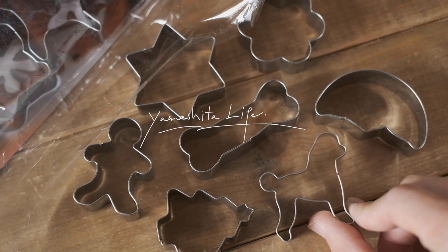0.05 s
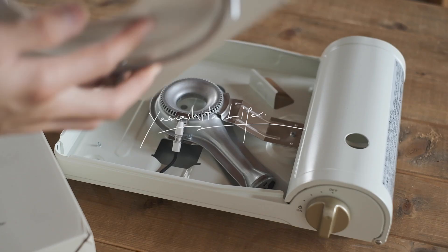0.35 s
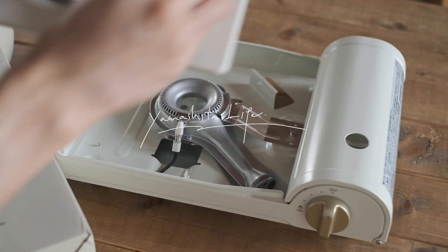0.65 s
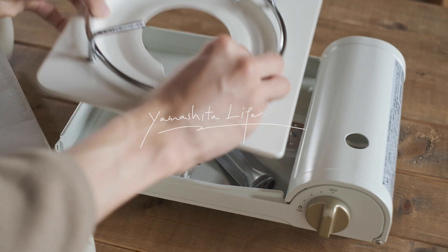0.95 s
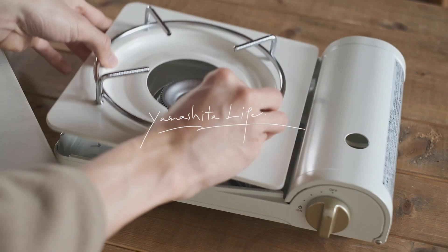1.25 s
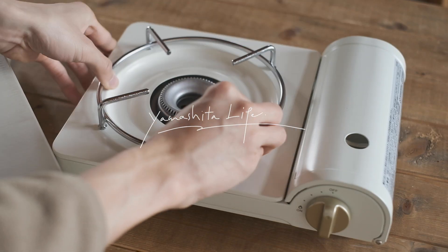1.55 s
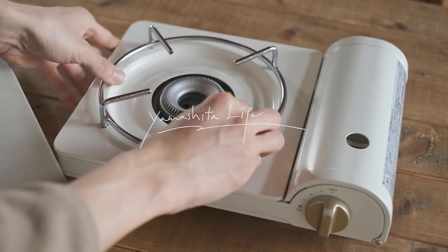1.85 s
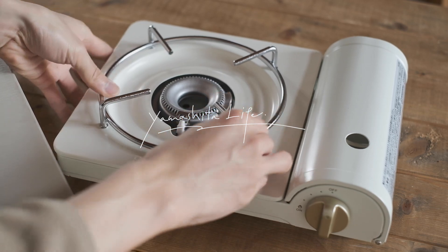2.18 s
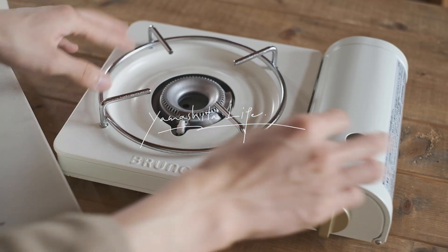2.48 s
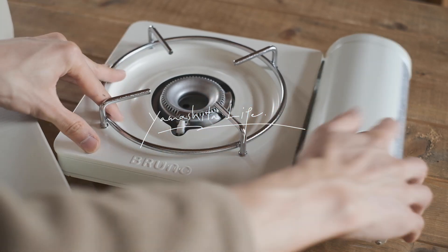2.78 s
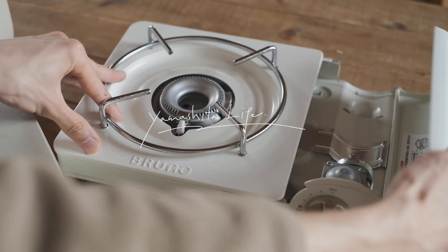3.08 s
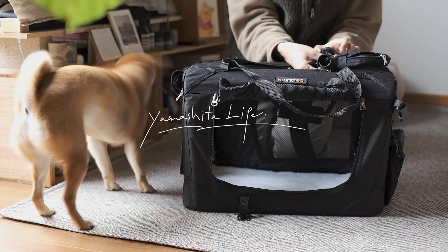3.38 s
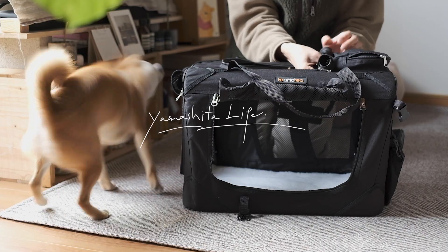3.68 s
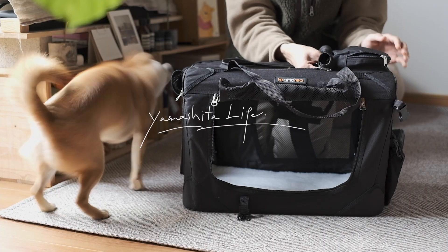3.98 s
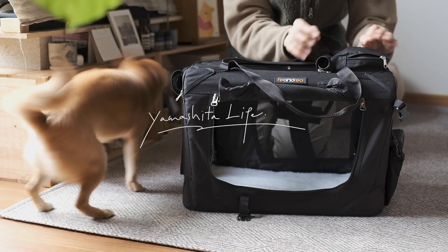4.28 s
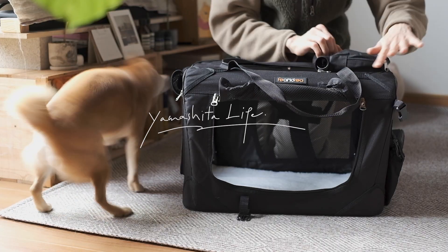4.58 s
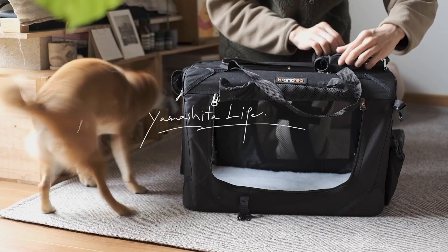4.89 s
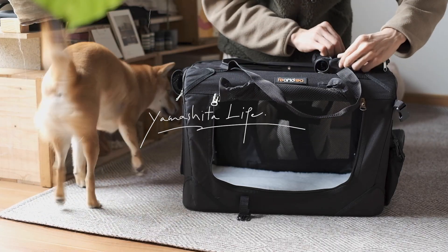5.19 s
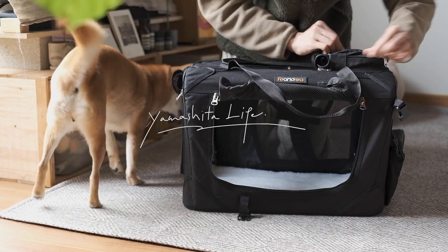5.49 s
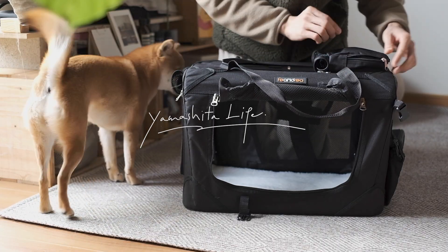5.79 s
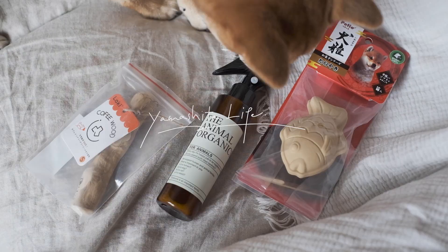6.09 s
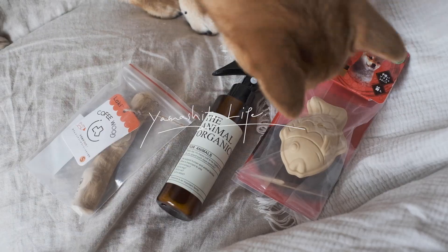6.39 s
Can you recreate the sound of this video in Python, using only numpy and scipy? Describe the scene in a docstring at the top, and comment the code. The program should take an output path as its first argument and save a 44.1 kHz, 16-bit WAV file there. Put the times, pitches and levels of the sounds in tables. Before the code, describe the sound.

In a quiet room, a metal plate clatters onto its base, followed by softer cloth rustling, fastener clicks and jingling zip pulls.

```python
"""A quiet room, the microphone close to a wooden table, everything straight in front of it.
First tin cookie cutters tap the wood. The enamelled top plate of a tabletop stove then slides through
the hands, knocks once so that its wire trivet sings, clatters onto its base and is pressed home.
At three seconds a cover unlatches. Last, hands pat and fold the stiff cloth of a pet carrier,
its fasteners clicking and its zip pulls jingling over the still air."""
import sys
import numpy as np
from scipy import signal
from scipy.fft import rfft, irfft
from scipy.io import wavfile

SR = 44100
rng = np.random.default_rng(int(sys.argv[2]) if len(sys.argv) > 2 else 0)


def file_out(sig):
    """Save sig as 16-bit WAV at sys.argv[1]."""
    # one column per channel
    cols = np.atleast_2d(sig).T
    # limit, then scale
    lim = np.clip(cols, -1, 1)
    pcm = np.round(lim * 32767).astype(np.int16)
    wavfile.write(sys.argv[1], SR, pcm)


N = 293265
TIME = np.arange(N) / SR
AGE = np.arange(SR) / SR  # seconds since a contact
LANDING_S = 1.328  # the plate meets its base

# The bands of a contact: thud, body, clank, ring, edge. Each row: low and high limit in Hz.
BANDS_HZ = [(90, 600), (600, 1400), (1400, 3000), (3000, 5400), (5600, 16000)]
# A harder contact trades thud for treble. Each entry: the share of the hardness that a band gains.
HARDNESS_SHARE = [-0.26, 0.062, 0.76, 0.94, 1.01]
# Colour of each kind of contact. Each entry: a band's offset in dB.
PLATE_COLOUR_DB = [-16.5, -0.5, -4, -7, -15.5]
LATCH_COLOUR_DB = [-2, -0.5, 1, 1.5, -6]
CLOTH_COLOUR_DB = [-14, -2.5, -1, -6, -21]
FASTENER_COLOUR_DB = [-7, 0, 1, -4, -12]
CUTTER_COLOUR_DB = [-13.5, -1, 2, -8, -21]

# Knocks and pats. Each row: start in seconds, level in dB, hardness in dB, t60 in seconds.
PLATE_KNOCKS = [(0.765, -40, 9.5, 0.13), (1.327, -31.5, 8.5, 0.1), (1.378, -34, 2.5, 0.065),
                (1.412, -39.5, 6.5, 0.074), (1.458, -25.5, 2.5, 0.087), (1.538, -24.5, -5.5, 0.1),
                (1.743, -24, -4, 0.085), (1.757, -27, -3.5, 0.12), (2.351, -39, -4.5, 0.07),
                (2.557, -43, -22, 0.2), (2.602, -40.5, -8, .08), (2.642, -38.5, -8, 0.14),
                (2.665, -40.5, -32, .09)]
CLOTH_PATS = [(3.589, -50, -6.5, .22), (3.815, -59.5, 5, 0.17), (4.055, -46.5, 2, 0.27),
              (4.14, -57, -1, .07), (4.21, -49, 2, 0.23), (4.364, -46, 1.5, 0.13), (4.504, -40, -9, 0.16),
              (4.534, -40.5, -15.5, 0.11), (4.559, -38.5, -12, 0.065), (4.696, -45, 2.5, 0.051),
              (4.787, -55.5, 6, 0.12), (5.055, -49.5, -3, 0.15), (5.204, -53, 1.5, 0.086),
              (5.91, -62.5, 10.5, 0.087)]
# Small contacts. Each row: start in seconds, level in dB, hardness in dB.
LATCH_SNAPS = [(3.021, -49, 8)]
FASTENER_CLICKS = [(3.723, -65.5, 11.5), (3.943, -55.5, -0.5), (4.569, -51, 10), (4.978, -42, 1.5),
                   (5.096, -47.5, -10), (5.346, -57, 2), (5.427, -42.5, 0), (6.025, -70.5, 16)]
CUTTER_TAPS = [(0.082, -55, -7.5), (0.213, -61, 7), (0.233, -49, 0.5)]
# Parts set ringing. Each row: start in seconds, level in dB.
TRIVET_RINGS = [(0.768, -48)]
BASE_FLEXES = [(1.466, -50), (2.368, -40), (2.655, -45)]
RIM_TICKS = [(0.768, -35.5)]
ZIP_JINGLES = [(4.592, -55), (5.43, -57), (5.95, -65), (6.025, -58)]
# Hand strokes. Each row: peak time in seconds, level in dB, rise and fall over 20 dB in seconds.
FINGER_SLIDES = [(0.272, -49, 0.0035, 0.23), (0.39, -58, 0.036, 0.18), (0.535, -47, 0.067, 0.062),
                 (0.695, -50.5, 0.16, .12), (0.765, -54, 0.04, 0.26), (1.31, -64, .09, .1),
                 (2.07, -56.5, 0.22, 0.1), (2.32, -57, 0.092, 0.069), (2.615, -51.5, 0.0077, .07),
                 (2.72, -53, 0.086, 0.11), (3.05, -59.5, 0.4, 0.3)]
PLATE_SHOVES = [(1.45, -40, 0.34, 0.22), (2.07, -51.5, 0.068, 0.095), (2.34, -48.5, 0.082, 0.12),
                (2.7, -64, .08, 0.17), (3.08, -52.5, 0.23, 0.16)]
CLOTH_SWEEPS = [(4.56, -44.5, 0.14, .14), (4.675, -49.5, 0.061, 0.064), (4.945, -51.5, 0.093, 0.21),
                (5.445, -52, 0.086, 0.078), (5.532, -45.5, 0.052, 0.084), (5.98, -62.5, 0.35, .13)]
# How busily the hands work the cloth. Each row: time in seconds, relative effort in dB.
HANDLING = [(3.15, -76), (3.4, -61), (3.56, -61.5), (4.35, -59), (4.58, -48), (4.77, -55.5), (5.06, -56.5),
            (5.2, -54.5), (5.43, -60.5), (5.66, -63), (5.88, -76.5), (6.1, -61.5)]
# Layers of the rustle. Each row: low and high limit in Hz, level at average effort in dB,
# dB gained per dB of effort, offset in a sweep in dB.
RUSTLE_LAYERS = [(140, 1390, -64, 1.0, -0.5), (1450, 4840, -64, 0.95, -1.5), (5360, 21300, -68.5, 0.82, -5)]

# Each object's own notes. Each row: frequency in Hz, level in dB, t60 in seconds.
PLATE_MODES = [(195, -16, .35), (272, -12, .35), (488, -6, .22), (518, -5, .2), (588, -8, .24),
               (645, -7, .2), (743, -1, .2), (815, -2.5, .2), (975, -2, .19), (1030, -3, .17),
               (1082, -1, .16), (1150, -4, .18), (1496, -7, .25), (1750, -9, .24), (1960, -7, .22),
               (2235, -9, .19), (2331, -7, .22), (2430, -11, .18), (2640, -9, .24), (3300, -13, .18),
               (3490, -13, .18), (3950, -11, .16), (4240, -12, .19), (4480, -13, .19), (5000, -14, .15),
               (5820, -24, .18), (6510, -24, .17), (8200, -27, .14)]
TRIVET_MODES = [(325, -4, .18), (1184, -17, 2.8), (2370, -9, .6), (2481, -9, .55), (2595, -3, .4),
                (2968, -8, .35), (3305, -2, .3), (3526, -4, .2), (3914, -6, .35), (4235, -5, .28),
                (4450, -10, .22), (4640, -9, .18), (5012, -10, .25), (5329, -7, .25), (5970, -6, .16),
                (7461, -15, .4), (10580, -18, .25)]
BASE_MODES = [(178.6, -23, 0.69), (208, -7.5, 0.21), (275.4, 0.5, 0.3)]
LATCH_MODES = [(618, -7, 0.16), (813, -9, 0.2), (1210, -5, 0.41), (1400, -4, 0.28), (1570, -5, 0.2),
               (2360, 5, 0.31), (2440, -4, 0.27), (3000, 9, 0.27), (3930, 7, 0.1), (4570, -9, 0.25),
               (7300, -27, 0.29)]
FASTENER_MODES = [(222, 8, 0.21), (322.5, 1, 0.42), (985, 6, 0.14), (1040, 3, 0.41), (1450, -6, 0.12),
                  (2940, 0, 0.045), (4400, -9, 0.22)]
ZIP_MODES = [(9600, -14, .1), (14850, -5, .12), (14970, -7, .1), (15100, -7, .1)]
CUTTER_MODES = [(767, -3, 0.14), (1000, -18, 0.19), (1450, -3, 0.12), (2260, 18, 0.11), (2580, -11, 0.099),
                (4160, -2, 0.054), (7160, 6, 0.22), (9900, -12, 0.33)]
# Spectra of the materials' crowds of weak modes. Each row: frequency in Hz, relative level in dB.
METAL = [(59, -65), (100, -22.5), (358, -9), (492, -11), (676, -13.5), (801, -2), (910, -7), (1080, -9.5),
         (1360, -11), (1480, -16.5), (3050, -14.5), (4380, -15), (6840, -24.5), (13200, -31),
         (16000, -38.5)]
CLOTH = [(59, -48), (100, -9.5), (328, 0.5), (430, -2.5), (524, -5.5), (608, -1), (736, -4), (1030, -3),
         (2130, -7), (2800, -4.5), (3190, -11), (4110, -11.5), (6840, -27), (15000, -34), (16000, -38)]
SKIN = [(180, -44), (300, -8), (689, -8), (814, 4.5), (915, -4), (1150, -1.5), (1610, -12), (2320, -0.5),
        (3030, -6.5), (4590, -1), (6960, -9), (10600, -13), (16000, -17)]

# Room tone: the air, the filter for its left-right difference, the air round the table, the rumble.
# Each row: frequency in Hz, relative level in dB.
AIR = [(20, -50), (35, -20), (80, -2), (200, 0), (450, -5), (1100, -17), (3000, -22), (9000, -23),
       (16000, -25)]
AIR_SIDE = [(60, -38), (180, -49), (550, -22), (1650, -7), (4970, -3), (15000, -1)]
TABLE_AIR = [(35, -63), (60, -42), (180, -6), (529, -7), (851, -7.5), (1160, -12.5), (1610, -14.5),
             (3000, -18.5), (3900, -24), (6600, -120)]
RUMBLE = [(18, -56), (30, -38), (41, -39), (54, -3.5), (113, 0.5), (150, -5.5), (200, 3), (260, -11),
          (440, -120)]
# The room's short tail. Each row: frequency in Hz, t60 in seconds.
ROOM_T60 = [(150, 0.27), (400, 0.46), (1000, 0.28), (3000, 0.33), (7000, 0.26), (14000, 0.35)]


def stove():
    """Loudest at the microphone: the plate slides and clatters home, and the parts round it ring."""
    enamel = clustered(crowded(METAL, uneven_db=2.5, spacing_hz=48), PLATE_MODES, dip_db=5.0)
    plate = finger_slides() + plate_grind(enamel) + plate_knocks(enamel)
    return plate + latch() + trivet() + sheet_base() + rim_tick()


def plate_knocks(enamel):
    """The enamelled plate knocks, first once while held free in the hands, then on its base, and rings briefly."""
    return contacts(PLATE_KNOCKS, PLATE_COLOUR_DB, enamel, PLATE_MODES,
                    modes_db=-8.0, room_db=-11.0, crack_db=-1.5, build_s=0.0014, blow_s=0.017)


def plate_grind(enamel, settle_db=-18.5, fade_db_per_s=63.5):
    """Once down, the plate grinds on its base with each shove and as it settles after each knock."""
    grit = colour(band(grains(per_s=900, spread_db=1.17), 170, 3670), enamel)
    settling_power = sum((TIME > s) * from_db(db + settle_db - fade_db_per_s * np.abs(TIME - s)) ** 2
                         for s, db, *_ in PLATE_KNOCKS if s > LANDING_S)
    envelope = (TIME > LANDING_S) * np.hypot(strokes(PLATE_SHOVES), np.sqrt(settling_power))
    return envelope * rubbed(grit, PLATE_MODES, ring_db=-6.0)


def finger_slides():
    """Skin slips over the enamel and sets the trivet singing."""
    slips = grains(per_s=3000, spread_db=3.0)
    skin = colour(slips, crowded(SKIN, uneven_db=3.2, spacing_hz=70))
    return strokes(FINGER_SLIDES) * rubbed(skin, TRIVET_MODES, ring_db=-7.0)


def rim_tick(t60=0.074):
    """The plate's thin rim catches and rings only in its highest, tightly packed modes."""
    envelope = sum((TIME > s) * from_db(db - 60 * np.abs(TIME - s) / t60) for s, db in RIM_TICKS)
    shimmer = band(rng.standard_normal(N), 11500, 15000)
    return envelope * shimmer / rms(shimmer)


def sheet_base():
    """The stove's sheet base flexes as the plate is pressed home."""
    return sympathetic(BASE_FLEXES, BASE_MODES, swell_s=0.013)


def trivet():
    """The wire trivet sings when the plate is knocked while held free."""
    return sympathetic(TRIVET_RINGS, TRIVET_MODES, swell_s=0.0025)


def latch():
    """The latch lets go with a snap that rings the metal cover."""
    cover = clustered(METAL, LATCH_MODES, dip_db=5.0)
    return contacts(lasting(LATCH_SNAPS, t60=0.088), LATCH_COLOUR_DB, cover, LATCH_MODES,
                    modes_db=0.5, room_db=-13.0, crack_db=3.0, build_s=0.0008, blow_s=0.012)


def carrier():
    """Close up, hands pat the cloth, fasteners click and zip pulls jingle; the room rumbles faintly."""
    present = np.interp(TIME, [3.12, 3.2, 6.06, 6.1], [0, 1, 1, 0])
    rumble = from_db(-67.5) * noise(RUMBLE)
    pats = contacts(CLOTH_PATS, CLOTH_COLOUR_DB, CLOTH, modes=[],
                    modes_db=0, room_db=-15.0, crack_db=6.5, build_s=0.0033, blow_s=0.0093)
    clicks = contacts(lasting(FASTENER_CLICKS, t60=0.035), FASTENER_COLOUR_DB, CLOTH, FASTENER_MODES,
                      modes_db=-10.0, room_db=-15.0, crack_db=8.0, build_s=0.0007, blow_s=0.007)
    cloth = rustle()
    zip_pulls = sympathetic(ZIP_JINGLES, ZIP_MODES, swell_s=0.00046)
    return present * (cloth + rumble) + pats + clicks + zip_pulls


def rustle():
    """Stiff cloth creases and brushes in fits, louder as the hands get busier or sweep over it."""
    times, handling_db = np.transpose(HANDLING)
    effort_db = np.interp(TIME, times, handling_db - handling_db.mean())
    sweeps = strokes(CLOTH_SWEEPS)
    fibres = colour(grains(per_s=1100, spread_db=3.2), CLOTH) * flutter(per_s=35, depth_db=1.8)
    out = np.zeros(N)
    for low, high, db, follows, sweep_db in RUSTLE_LAYERS:
        layer = band(fibres, low, high)
        envelope = np.hypot(from_db(db + follows * effort_db), from_db(sweep_db) * sweeps)
        out += envelope * layer / rms(layer)
    return out


def cutters():
    """Light tin shapes tap the wooden table, just in front of the microphone."""
    tin = clustered(METAL, CUTTER_MODES, dip_db=8.0)
    return contacts(lasting(CUTTER_TAPS, t60=0.056), CUTTER_COLOUR_DB, tin, CUTTER_MODES,
                    modes_db=-4.0, room_db=-17.0, crack_db=5.0, build_s=0.00075, blow_s=0.026)


def room_tone():
    """Still air, a little fuller round the table; only the faint top hiss differs left to right."""
    air = noise(AIR)
    side = from_db(-3.5) * shaped(noise(AIR), AIR_SIDE) * [[1], [-1]]
    table = np.interp(TIME, [0, 0.27, 0.3, 3.1, 3.2], [0.47, 0.63, 0.79, 1, 0.37]) * noise(TABLE_AIR)
    return from_db(-67) * (air + side) + from_db(-64) * table


def contacts(rows, colour_db, spectrum, modes, modes_db, room_db, crack_db, build_s, blow_s):
    """Each contact: a crack, a fast-dying crowd of modes, the object's own notes and the room's tail."""
    out = np.zeros(N + len(AGE))
    blow = slice(0, int(blow_s * SR))  # levels hold over this opening stretch
    crack = 1 + from_db(crack_db - 60 * AGE / 0.0085)
    for s, level_db, hardness_db, t60 in rows:
        crowd = noise(spectrum, len(AGE))
        notes = ringing(modes)
        attack_s = max(build_s * 2 ** (-hardness_db / 12), 1e-4)  # harder builds up faster
        attack = 1 - np.exp(-AGE / attack_s)
        decay = crack * from_db(-60 * AGE / t60)
        start = int(s * SR)
        for (low, high), band_db, share in zip(BANDS_HZ, colour_db, HARDNESS_SHARE):
            centre_hz = np.sqrt(low * high)
            room = from_db(room_db - 60 * AGE / at_hz(ROOM_T60, centre_hz))
            dense = band(crowd * attack * np.hypot(decay, room), low, high)
            tones = band(notes * attack, low, high)
            # the treble holds too many modes for single notes to stand out
            clarity = from_db(modes_db + at_hz([(1000, 1.5), (3000, -5.5), (10000, -1)], centre_hz))
            part = dense / rms(dense[blow]) + clarity * tones / rms(tones[blow])
            gain = from_db(level_db + band_db + share * hardness_db)
            out[start:start + len(AGE)] += gain * part / rms(part[blow])
    return out[:N]


def lasting(rows, t60):
    """Give alike contacts one decay time."""
    return [(*row, t60) for row in rows]


def ringing(modes, vary_db=0):
    """Decaying modes; the point of contact sets each one's sign and, by vary_db, its strength."""
    out = np.zeros(len(AGE))
    for hz, db, t60 in modes:
        sign = rng.choice([-1, 1])
        envelope = from_db(db + vary_db * rng.standard_normal() - 60 * AGE / t60)
        out += sign * envelope * np.sin(2 * np.pi * hz * AGE)
    return out


def sympathetic(rows, modes, swell_s):
    """A part that is not struck itself takes up the blow and swells over a few cycles."""
    pushes = np.zeros(N)
    for s, db in rows:
        pushes[int(s * SR)] = from_db(db)
    response = ringing(modes, vary_db=2.0) * (1 - np.exp(-AGE / swell_s))
    return signal.fftconvolve(pushes, response)[:N]


def strokes(rows):
    """Gain of rubbing strokes: each swells as the hand speeds up and fades as it slows."""
    power = np.zeros(N)
    for s, db, rise_s, fall_s in rows:
        away = np.maximum((s - TIME) / rise_s, (TIME - s) / fall_s)
        power += from_db(db - 20 * np.minimum(away, 10) ** 1.14) ** 2  # 1.14 rounds the top
    return np.sqrt(power)


def grains(per_s, spread_db):
    """Friction: tiny slips of uneven size over a smooth hiss."""
    slips = (rng.random(N) < per_s / SR) * rng.choice([-1, 1], N)
    slips = slips * from_db(spread_db * np.minimum(rng.exponential(1, N), 4))
    return slips / rms(slips) + rng.standard_normal(N)


def rubbed(slips, modes, ring_db):
    """Slips together with the modes they set singing; rms 1."""
    sung = signal.fftconvolve(slips, ringing(modes))[:N]
    both = slips + from_db(ring_db) * sung / rms(sung)
    return both / rms(both)


def flutter(per_s, depth_db):
    """A gain that wanders at random."""
    knots = rng.standard_normal(2000)
    return from_db(depth_db * np.interp(TIME * per_s, np.arange(len(knots)), knots))


def crowded(spectrum, uneven_db, spacing_hz):
    """Hundreds of close modes lay a steady ripple over an object's spectrum."""
    hz = np.arange(40, 17000, spacing_hz)
    ripple_db = uneven_db * np.minimum(hz / 1500, 1) * np.clip(rng.standard_normal(len(hz)), -2, 2)
    return np.column_stack([hz, at_hz(spectrum, hz) + ripple_db])


def clustered(spectrum, modes, dip_db, width_hz=41):
    """Weak modes crowd round the strong ones, so the response sags between them."""
    hz = np.arange(40, 17000, 24.0)
    near = np.max([1 / (1 + ((hz - mode_hz) / width_hz) ** 2) for mode_hz, *_ in modes], axis=0)
    return np.column_stack([hz, at_hz(spectrum, hz) - dip_db * (1 - near)])


def noise(spectrum, length=N):
    """Steady noise with a spectrum; rms 1."""
    return colour(rng.standard_normal(length), spectrum)


def colour(x, spectrum):
    """Give an excitation a spectrum; rms 1."""
    y = shaped(x, spectrum)
    return y / rms(y)


def shaped(x, spectrum):
    """Filter by a curve in dB."""
    hz = np.fft.rfftfreq(len(x), 1 / SR)
    return irfft(rfft(x) * from_db(at_hz(spectrum, hz)), len(x))


def band(x, low, high):
    """Causal band-pass with steep skirts."""
    low_cut = signal.butter(4, low, "high", fs=SR, output="sos")
    high_cut = signal.butter(6, high, fs=SR, output="sos")
    return signal.sosfilt(np.vstack([low_cut, high_cut]), x)


def at_hz(points, hz):
    """Read a table on a log-frequency axis."""
    known_hz, values = np.transpose(points)
    return np.interp(np.log(np.maximum(hz, 1)), np.log(known_hz), values)


def from_db(db):
    """Decibels to gain."""
    return 10 ** (np.asarray(db) / 20)


def rms(x):
    """Root mean square."""
    return np.sqrt(np.mean(x ** 2) + 1e-20)


def scene():
    """All the handling is close and dead centre, with the room tone behind it."""
    return cutters() + stove() + carrier() + room_tone()


def record(dry, cutoff_hz=15900):
    """The microphone's signal is cut steeply at the top."""
    return signal.sosfilt(signal.ellip(10, 0.1, 70, cutoff_hz, fs=SR, output="sos"), dry)


dry = scene()
out = record(dry)
file_out(out)
```